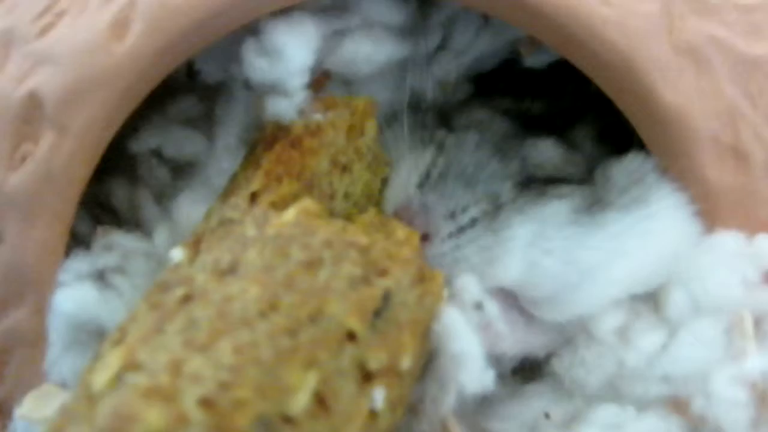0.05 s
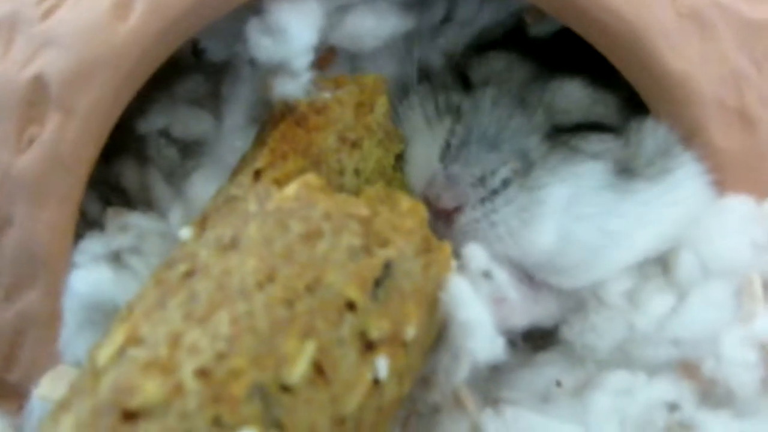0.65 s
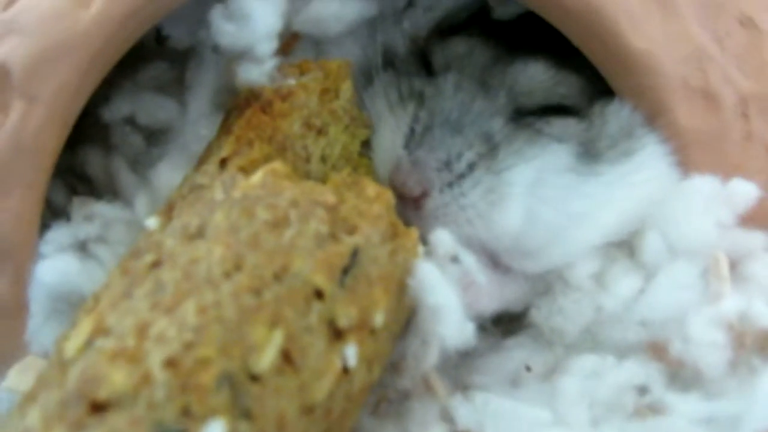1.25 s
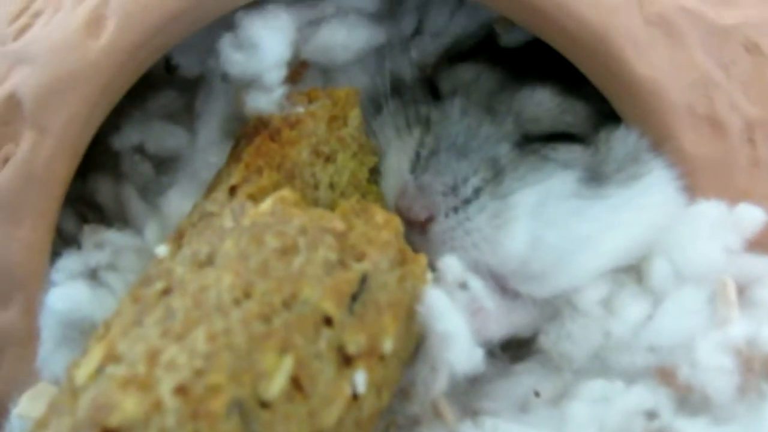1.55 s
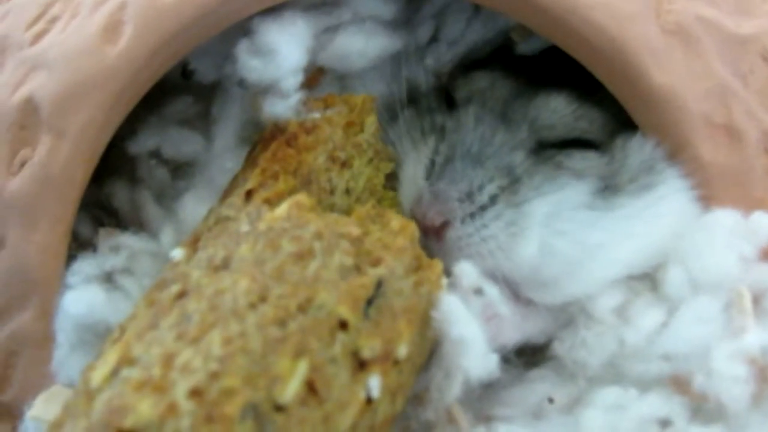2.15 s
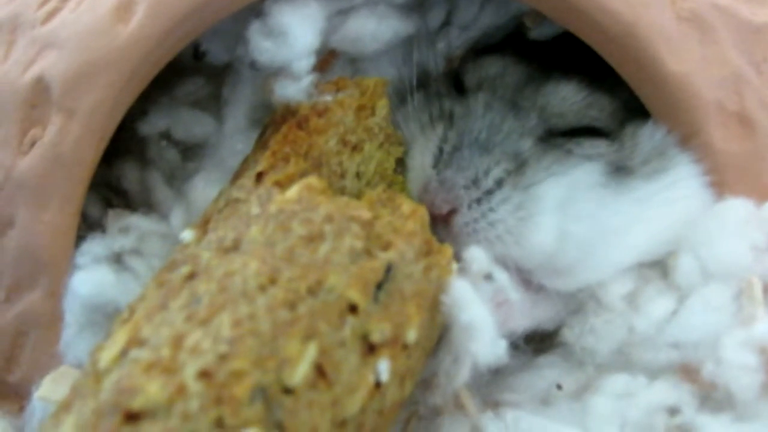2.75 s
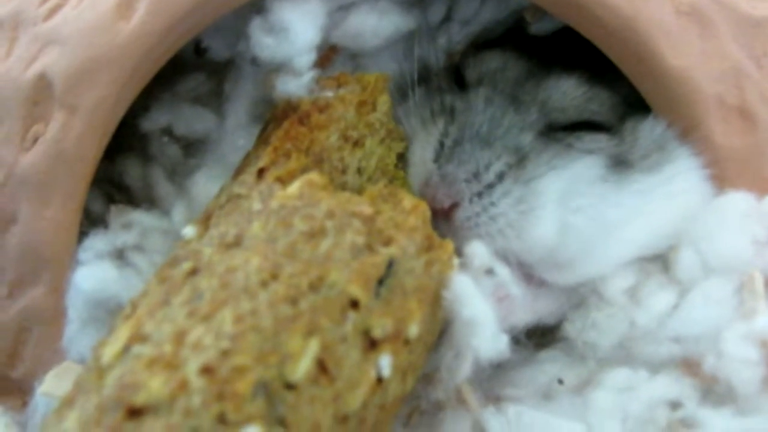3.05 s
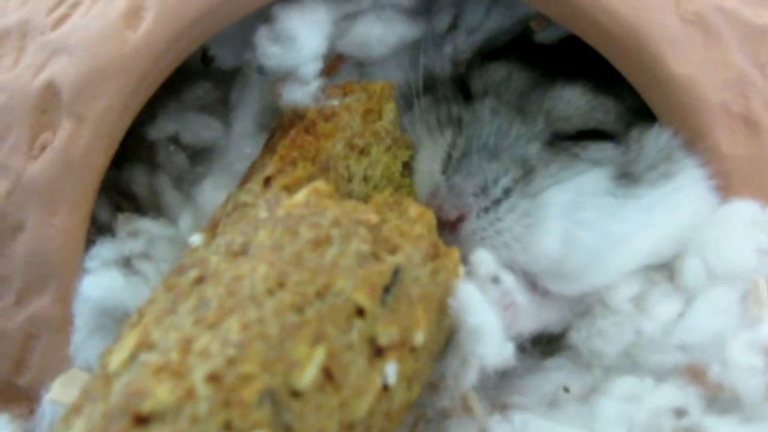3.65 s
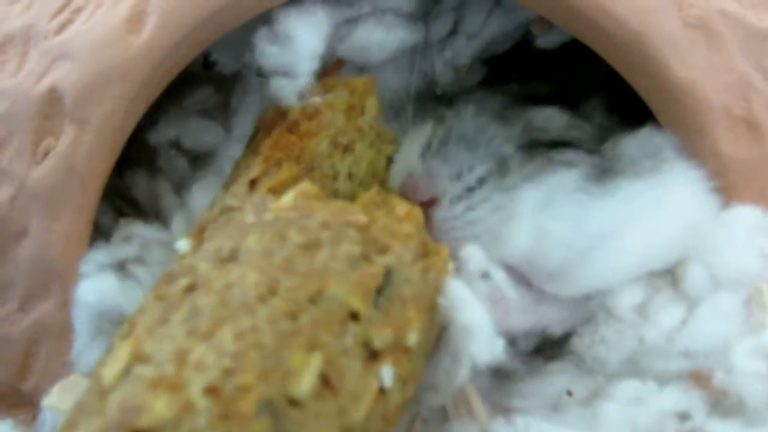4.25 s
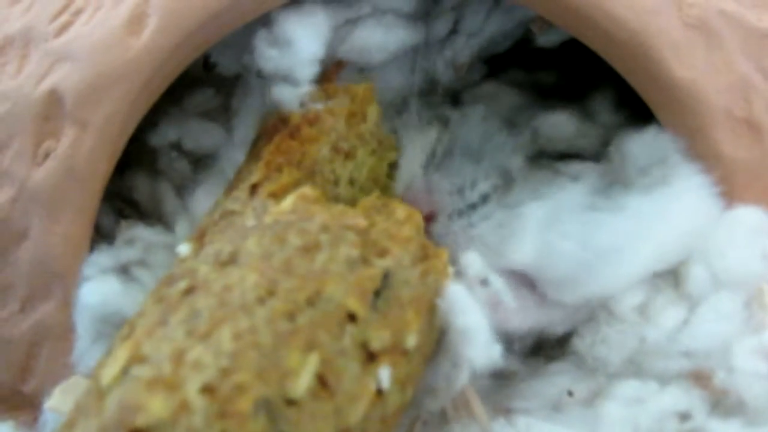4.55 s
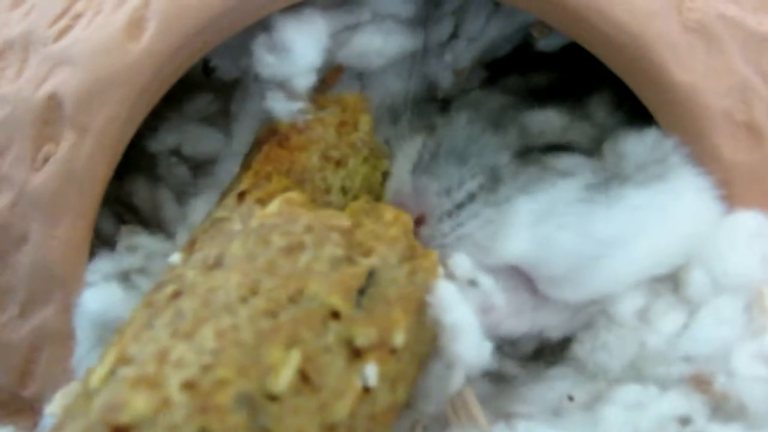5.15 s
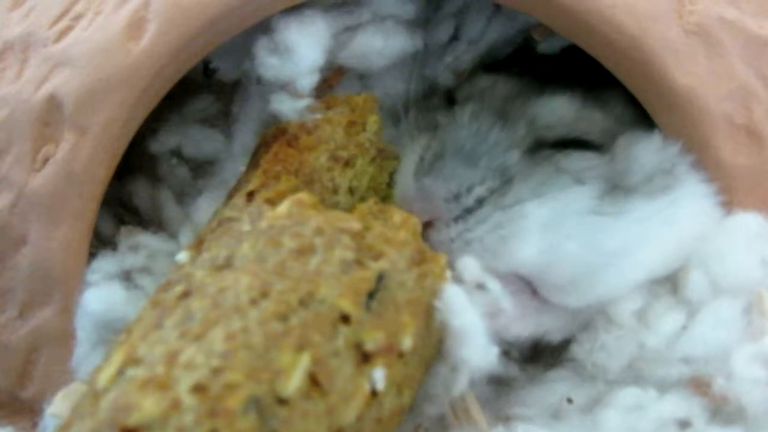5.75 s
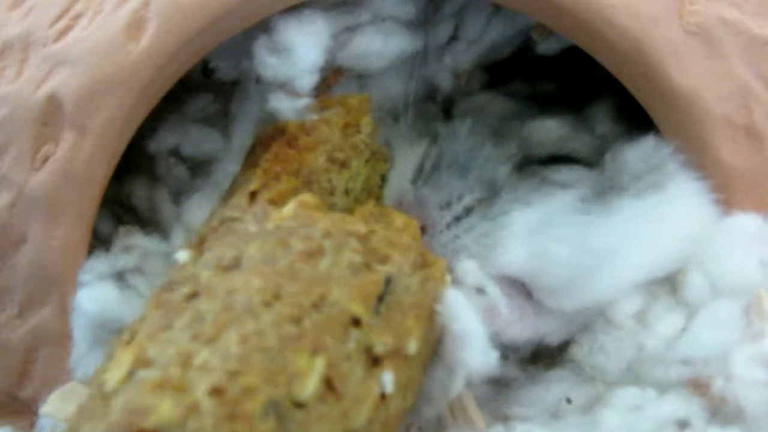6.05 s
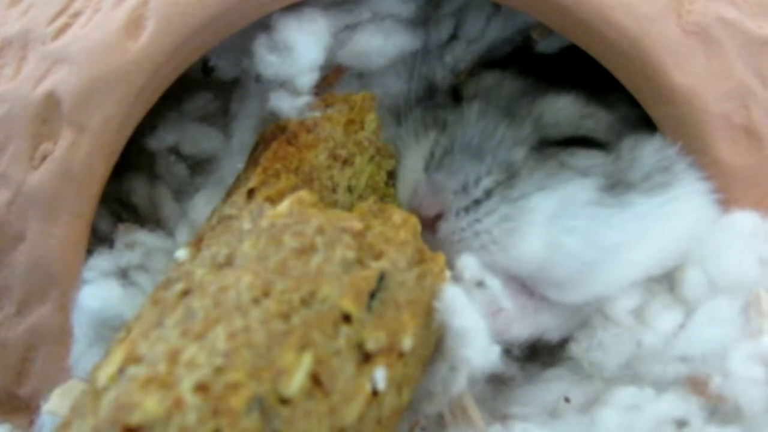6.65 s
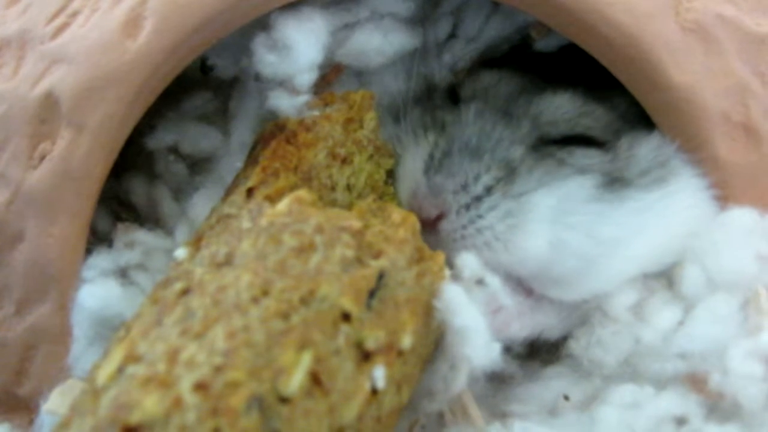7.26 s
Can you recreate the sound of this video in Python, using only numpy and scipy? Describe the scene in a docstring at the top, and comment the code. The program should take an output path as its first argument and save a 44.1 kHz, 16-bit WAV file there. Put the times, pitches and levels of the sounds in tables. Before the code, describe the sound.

In a quiet room, a small rodent snaps the crust of a hard treat very close by. A few crisp cracks come first, then a little finger rubbing and a couple of knocks on the microphone. The teeth tick faintly for a while before more irregular clusters of brittle crunches follow. Underneath lie steady hiss, a barely audible clock and a few soft, far knocks.

```python
"""Dry, close cracks: a hamster gnaws a hard snack stick in the mouth of a clay hut.
Every bite snaps the crust and rings stick and hut for a moment; the quiet room answers faintly.
Between bites the teeth tick lightly. Early on, fingers rub and bump the hand-held camera.
Far off, a clock and a few soft knocks sit over a bed of hiss and faint electrical hum."""
import sys
import numpy as np
from scipy import signal
from scipy.fft import rfft, irfft
from scipy.io import wavfile
from scipy.ndimage import uniform_filter1d

SR = 44100
rng = np.random.default_rng(int(sys.argv[2]) if len(sys.argv) > 2 else 0)


def persist_wave(psi):
    """Save psi, clipped to +-1, as 16-bit WAV."""
    counts = np.round(np.clip(psi, -1, 1) * 32767).astype(np.int16)
    wavfile.write(sys.argv[1], SR, np.atleast_2d(counts).T)


N = 326340
TAPS = 4096  # length of the short impulse responses
HZ = np.fft.rfftfreq(TAPS, 1 / SR)
HARD_BITE_DB, RING_HZ = -15, 4013  # a full-force bite; the stick's main ring at a middling grip

# resonances of stick and hut, rung by every tooth contact: (pitch [Hz], width [Hz], level [dB])
STICK_MODES = [(530, 160, -21), (1500, 200, -19), (2120, 220, -2), (2520, 180, -4.5), (3350, 400, -12),
               (5400, 330, -13), (6450, 330, -19), (7680, 650, -14.5), (9170, 550, -14), (11200, 1000, -26),
               (12400, 900, -27), (14300, 1500, -36)]
def gnawing(gain_db=24, uneven_db=0.95, fracture_s=0.0004, crumble_t60=0.023):
    """Each fracture is a snap and a spray of splinters that ring the stick; the hut scatters the ring."""
    out = np.zeros((2, N))
    t = np.arange(TAPS) / SR
    for s, db, knock_db, clack_db, snap_db, grip in tooth_contacts():
        # some resonances depend on the grip; the others are struck a little unevenly
        modes = np.array(STICK_MODES + grip)
        norm = np.sqrt(np.mean(resonances(modes, HZ) ** 2))
        modes[:len(STICK_MODES), 2] += uneven_db * rng.standard_normal(len(STICK_MODES))
        eq = [(300, knock_db - 12), (560, knock_db), (1000, knock_db),
              (1720, clack_db - 5), (2000, clack_db), (2500, clack_db),
              (2900, -4), (3500, 0), (4700, 0),
              (5700, snap_db), (12500, snap_db), (16000, snap_db - 10)]
        stick = ring(resonances(modes, HZ) * amp(curve(eq, HZ))) / norm
        click = smear(stick, fracture_s)
        # hard bites snap cleanly, gentle ones crumble more
        crumble_db = -17 + 0.42 * min(HARD_BITE_DB - db, 30)
        splinters = rng.standard_normal(TAPS) * (rng.random(TAPS) < .12)
        splinters *= amp(-60 * t / crumble_t60) * (t > .0005)
        force = amp(crumble_db) * splinters / (np.linalg.norm(splinters) + 1e-9)
        force[0] += 1  # the snap itself
        hut_rim = amp(-13) * scatter(t60=0.027, delay=.0004)
        hut_hollow = amp(-22) * scatter(t60=0.064, delay=0.0022)
        crack = signal.fftconvolve(force + hut_rim + hut_hollow, click[None], axes=1)
        add(out, s, amp(db + gain_db) * crack)
    return out


def bite(s, db, ring_hz, hollow_db, sharp_db):
    """Voices one crack: a hard bite drives the main ring, a gentle one lets the other parts stand out."""
    gentle_db = HARD_BITE_DB - db
    knock_db = -6.5 + 0.51 * gentle_db + hollow_db
    clack_db = -2 + .15 * gentle_db + 0.03 * (RING_HZ - ring_hz)  # a lower ring brings out the clack
    snap_db = -0.5 + 0.34 * gentle_db + sharp_db
    grip = [(736, 210, -8), (ring_hz, 735, 0)]  # hollow knock with the teeth sunk in, and main ring
    return s, db, knock_db, clack_db, snap_db, grip


# the crust cracks: (time [s], level [dB], ring pitch [Hz], hollowness [dB], sharpness [dB])
CRUST_CRACKS = [(0.0252, -21.5, 3980, 0.5, 0.5), (0.0502, -24.5, 4030, 1, 1.5),
                (0.0752, -19.5, 3820, 5, 0.5), (0.0788, -25, 3900, -6, -1), (0.1148, -16.5, 4030, 1.5, 5),
                (0.232, -34.5, 4100, -2, 5.5), (4.084, -33.5, 4280, 6.5, -1), (4.0895, -36.5, 4040, -4, -1),
                (4.312, -31.5, 4140, -11, 5), (4.4649, -45.5, 3800, -2, -7), (4.645, -39.5, 4160, 5, 0.5),
                (4.6627, -33, 3860, -2, -8), (4.7006, -22, 3930, -2.5, 0.5),
                (4.7045, -16.5, 4170, 0.5, -7.5), (4.708, -30.5, 3800, 0, 1), (4.8553, -45.5, 4170, 2.5, 3),
                (5.0787, -16, 4200, 5.5, 1.5), (5.1946, -45.5, 4070, 1.5, -1), (5.2025, -39, 4030, -15, -3),
                (5.2255, -18, 4056, -4, 3), (5.2589, -31, 4190, 4, -1.5), (5.2863, -34, 4020, 6.5, 4),
                (5.2942, -31.5, 3980, 1, -5), (5.9151, -21.5, 4045, -11, -4), (6.0326, -42, 4070, -1.5, -4),
                (6.052, -38, 3880, -2, -0.5), (6.0864, -22, 3970, -4, -7), (6.2242, -15.5, 4090, 0.5, -6.5)]
# the teeth tick against the stick: (time [s], level [dB], sharpness [dB])
TOOTH_TICKS = [(0.6195, -65, 8), (0.6254, -64.5, 11.5), (0.846, -48, 0.5), (1.5622, -56, -15),
               (1.5898, -48, 0.5), (1.906, -62.5, -3), (2.0327, -61.5, 1), (2.7446, -51, -7),
               (2.8117, -60.5, -5), (2.8937, -59, -8), (3.3877, -63, 2.5), (6.6955, -53.5, 3),
               (6.7214, -50, 4)]
# resonances with the teeth just touching: (pitch [Hz], width [Hz], level [dB])
LIGHT_GRIP = [(1200, 900, -10.5), (1850, 230, 2), (4100, 720, 1.5), (6200, 590, -14)]
def tooth_contacts(pause_s=0.15, firm_db=-40, strain_lead_s=0.032):
    """Cues the cracks, the light ticks and the faint give of the crust before a firm bite after a pause."""
    cracks = [bite(*row) for row in CRUST_CRACKS]
    knock_db, clack_db, snap_db = 4.5, 10.5, 14.5  # the tone of a tick
    ticks = [(s, db, knock_db, clack_db, snap_db + sharp_db, LIGHT_GRIP)
             for s, db, sharp_db in TOOTH_TICKS]
    strains = []
    for (previous, *_), (s, db, *_) in zip(CRUST_CRACKS, CRUST_CRACKS[1:]):
        if s - previous > pause_s and db > firm_db:
            onset = s - strain_lead_s * rng.uniform(.8, 1.2)
            strains.append(bite(onset, db=-54, ring_hz=RING_HZ, hollow_db=-2, sharp_db=-12))
    return cracks + ticks + strains


# decay of the room: (frequency [Hz], time to fall 60 dB [s])
ROOM_DECAY = [(200, .4), (800, 0.28), (1500, 0.33), (4500, 0.72), (8000, 0.21), (16000, .12)]
# tone of the room's tail: (frequency [Hz], level [dB])
ROOM_EQ = [(200, -18), (800, 16.5), (1500, 2), (2250, 7), (2850, 19), (3450, 3), (4200, 1.5), (5200, 4),
           (8000, 9.5), (16000, -26)]
def room(x, wet_db=-24, attack_s=0.0024):
    """The room's diffuse tail, each band dying at its own speed."""
    hz, t, bands = signal.stft(rng.standard_normal((2, SR * 3 // 4)), SR, nperseg=256)
    decay_db = curve(ROOM_EQ, hz)[:, None] - 60 * t / curve(ROOM_DECAY, hz)[:, None]
    bands = bands * amp(decay_db) * np.minimum(t / attack_s, 1)
    tail = signal.istft(bands, SR, nperseg=256)[1]
    tail /= np.linalg.norm(tail[0])
    return amp(wet_db) * signal.fftconvolve(x.mean(0)[None], tail, axes=1)[:, :N]


# resonances of the camera shell, bumped or rubbed: (pitch [Hz], width [Hz], level [dB])
SHELL_MODES = [(514, 31, -4.5), (963, 160, 0.5), (1410, 430, 3.5), (2270, 320, -3.5), (2910, 520, -2),
               (4020, 770, -9.5), (5460, 790, -1.5), (6600, 1800, -13.5), (10300, 1100, -26)]
# fingers bump the camera: (time [s], level [dB], treble [dB], low thump [dB])
FINGER_BUMPS = [(0.3795, -46, -27, -43), (1.0977, -21, 3, -66), (1.4958, -38.5, -2, -58),
                (1.4982, -27, -13.5, -69), (1.584, -38.5, -12, -68), (1.5854, -26.5, -19, -58)]
def finger_bumps(gain_db=21.5, left_db=-3, contact_s=0.00026, thump_hz=125, thump_t60=0.21,
                 sway_t60=0.37):
    """A knock on the shell reaches each microphone by its own path; the body thumps and sways after."""
    out = np.zeros((2, N))
    t = np.arange(SR // 4) / SR
    for s, db, treble_db, thump_db in FINGER_BUMPS:
        eq_db = curve([(650, -6), (950, 0), (3000, treble_db)], HZ)
        click = smear(ring(resonances(SHELL_MODES, HZ) * amp(eq_db)), contact_s)
        click /= np.linalg.norm(click)
        paths = amp(-6) * scatter(t60=0.021, delay=.0002)
        paths += amp(-14) * scatter(t60=0.073, delay=0.0048)
        paths[:, 0] += amp([left_db, 0])  # the direct hit
        add(out, s, amp(db + gain_db) * signal.fftconvolve(paths, click[None], axes=1))
        thump = np.sin(2 * np.pi * thump_hz * t) * amp(thump_db - 60 * t / thump_t60)
        sway = noise(lambda hz: resonances([(40, 80, 0)], hz), len(t))
        sway *= amp(db - 30 - 60 * t / sway_t60)
        add(out, s, (thump + sway) * np.minimum(t / 0.003, 1))
    return out


# fingers slide over the camera: (start [s], end [s], level [dB], treble [dB])
FINGER_RUBS = [(0.631, 0.693, -51, 3.5), (0.718, 0.798, -54.5, 3), (0.87, 0.944, -47, 2),
               (0.958, 1.047, -46, 3.5), (1.087, 1.155, -47, 3), (1.135, 1.216, -46.5, -4),
               (1.199, 1.244, -42.5, -4)]
def finger_rubs(grain_db=2.5, catch_db=2, rumble_db=-11):
    """Sliding skin makes a dense stream of tiny slips that ring the shell and shake it a little."""
    out = np.zeros((2, N))
    norm = np.linalg.norm(ring(resonances(SHELL_MODES, HZ)))
    for start, end, db, treble_db in FINGER_RUBS:
        size = round((end - start) * SR)
        catching = catch_db * noise(lambda hz: np.exp(-hz / 150), size, channels=1)  # grip and release
        slips = rng.standard_normal((2, size))
        slips *= amp(catching + grain_db * rng.exponential(1, size).clip(0, 5))
        eq_db = curve([(1300, 0.0058), (3000, treble_db)], HZ)
        shell = ring(resonances(SHELL_MODES, HZ) * amp(eq_db)) / norm
        stroke = amp(db) * unit(slips) * signal.windows.tukey(size, 0.44)
        add(out, start, signal.fftconvolve(stroke, shell[None], axes=1))
    pressure = np.sqrt(abs(uniform_filter1d((out ** 2).mean(0), SR // 5)))
    rumble = noise(lambda hz: resonances([(50, 140, 0)], hz), N)
    return out + amp(rumble_db) * pressure * rumble


# resonances of the clock case: (pitch [Hz], width [Hz], level [dB])
CLOCK_MODES = [(922, 97, 0), (1310, 500, -27), (2200, 2000, -14), (3880, 1700, -18)]
def clock(first_tick_s=.258, level_db=-53):
    """A tick rings the clock case once a second, across the room."""
    out = np.zeros((2, N))
    for s in first_tick_s + np.arange(N // SR + 1):
        tick = far_blow(lambda hz: resonances(CLOCK_MODES, hz), rise=0.0016, t60=1.0)
        add(out, s, amp(level_db) * tick)
    return out


# knocks elsewhere in the room: (time [s], level [dB])
SOFT_KNOCKS = [(0.293, -46), (4.252, -41.5), (7.312, -43.5)]
# their dull tone: (frequency [Hz], level [dB])
KNOCK_EQ = [(100, -26), (400, -3.5), (1000, -0.5), (1500, -2.5), (2500, -9.5), (5000, -27), (10000, -32),
            (16000, -47)]
def far_knocks():
    """Now and then something knocks softly, far off."""
    out = np.zeros((2, N))
    for s, db in SOFT_KNOCKS:
        knock = far_blow(lambda hz: amp(curve(KNOCK_EQ, hz)), rise=0.00033, t60=0.35)
        add(out, s, amp(db) * knock)
    return out


def far_blow(gain_at, rise, t60):
    """A distant blow arrives almost wholly as room reverberation."""
    t = np.arange(SR // 2) / SR
    return noise(gain_at, len(t)) * (1 - np.exp(-t / rise)) * amp(-60 * t / t60)


# tone of the hiss common to both microphones: (frequency [Hz], level [dB])
MID_EQ = [(20, -13), (45, 0.5), (70, -21), (120, -7.5), (250, -8.5), (550, -10), (830, -4), (1150, -6),
          (1330, -5), (1550, -7), (1900, -7.5), (2900, -12.5), (4500, -12.5), (8000, -16), (13000, -21.5),
          (15200, -26.5), (16000, -54)]
# tone of the hiss opposed between them: (frequency [Hz], level [dB])
SIDE_EQ = [(20, -7), (100, -8.5), (220, -5.5), (500, -6), (780, -3.5), (1300, -6.5), (2500, -11),
           (5000, -18), (8000, -23.5), (12000, -28.5), (16000, -34.5)]
def hiss(mid_db=-58, side_db=-47.0):
    """A steady, wide bed of hiss, far more side than mid."""
    mid = amp(mid_db) * noise(lambda hz: amp(curve(MID_EQ, hz)), N, channels=1)
    side = amp(side_db) * noise(lambda hz: amp(curve(SIDE_EQ, hz)), N, channels=1)
    return mid + side * np.array([[1], [-1]])


# electrical tones: (pitch [Hz], level [dB], right channel gain [x left])
HUM_TONES = [(100.6, -71, 1), (807, -70, 1), (7867, -70, -1.8)]
def hum(waver=0.52, waver_hz=20, whine_hz=15734, whine_db=-78):
    """Electrical tones waver in level and phase under a thin, steady whine."""
    out = np.zeros((2, N))
    t = np.arange(N) / SR
    for hz, db, right in HUM_TONES:
        swell, drift = waver * noise(lambda f: np.exp(-f / waver_hz), N)
        tone = np.sqrt(2) * (1 + swell) * np.cos(2 * np.pi * hz * t + drift)
        out += np.array([[1], [right]]) * amp(db) * tone
    return out + amp(whine_db) * np.sqrt(2) * np.cos(2 * np.pi * whine_hz * t)


def amp(db):
    """Decibels to gain."""
    return 10 ** (np.asarray(db) / 20)


def unit(x):
    """Scales to rms 1."""
    return x / np.sqrt(np.mean(x ** 2) + 1e-20)


def curve(points, hz):
    """Joins (Hz, value) points by straight lines on a log-frequency axis."""
    f, value = np.transpose(points)
    return np.interp(np.log(hz + 1), np.log(f + 1), value)


def add(mix, s, sound):
    """Mixes a stereo sound in at time s."""
    part = mix[:, max(round(s * SR), 0):][:, :sound.shape[-1]]
    part += sound[..., :part.shape[-1]]


def resonances(modes, hz):
    """Gain of a body with steep-sided resonances."""
    peaks = (amp(db) / (1 + ((hz - f) / (.78 * width)) ** 2) for f, width, db in modes)
    return np.sqrt(sum(peak ** 2 for peak in peaks))


def ring(gain):
    """The minimum-phase impulse response that has this gain at the frequencies HZ."""
    log_gain = np.log(np.maximum(gain / gain.max(), 1e-5))
    mirrored = np.concatenate([log_gain, log_gain[-2:0:-1]])
    return gain.max() * np.fft.ifft(np.exp(np.conj(signal.hilbert(mirrored)))).real


def smear(click, seconds):
    """A contact that lasts a moment: each part of the spectrum leaves at its own time."""
    delay = seconds * np.interp(HZ, np.linspace(0, SR / 2, num=24), rng.uniform(.3, 2, size=24))
    smeared = irfft(rfft(click) * np.exp(-2j * np.pi * np.cumsum(delay) * SR / TAPS))
    fade_out = np.clip(2 - 4 * np.arange(TAPS) / TAPS, 0, 1)
    return smeared * fade_out


def noise(gain_at, size, channels=2):
    """Unrelated noises of rms 1, coloured by a function of frequency."""
    white = rfft(rng.standard_normal((channels, size)))
    return unit(irfft(white * gain_at(np.fft.rfftfreq(size, 1 / SR)), size))


def scatter(t60, delay):
    """Dense reflections of energy 1 from nearby walls, different for each microphone."""
    t = np.arange(TAPS) / SR
    taps = rng.standard_normal((2, TAPS)) * amp(-60 * t / t60) * (t > delay)
    return taps / np.linalg.norm(taps, axis=1, keepdims=True)


def scene():
    """The hamster up front with its room, then camera handling and the quiet background."""
    bites = gnawing()
    return bites + room(bites) + finger_bumps() + finger_rubs() + clock() + far_knocks() + hiss() + hum()


def record(dry, ceiling=.85, cutoff_hz=16500):
    """Soft-clips the very loudest peaks, then cuts the extreme top."""
    rounded = dry / (1 + (dry / ceiling) ** 8) ** (1 / 8)
    lowpass = signal.firwin(511, cutoff_hz, window=("kaiser", 9), fs=SR)
    return signal.oaconvolve(rounded, lowpass[None], "same")


dry = scene()
out = record(dry)
persist_wave(out)
```